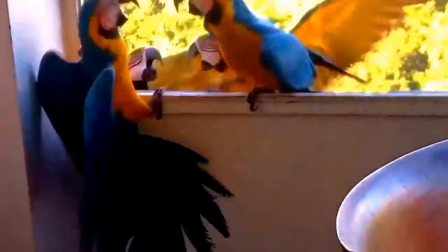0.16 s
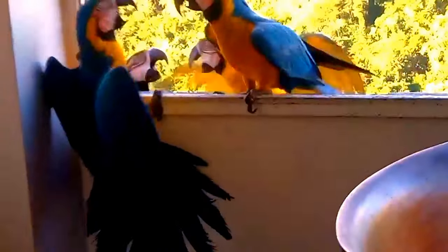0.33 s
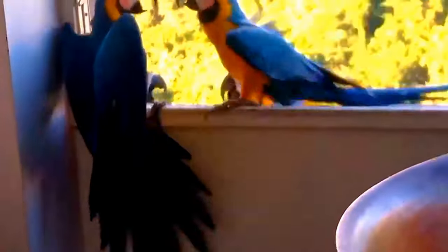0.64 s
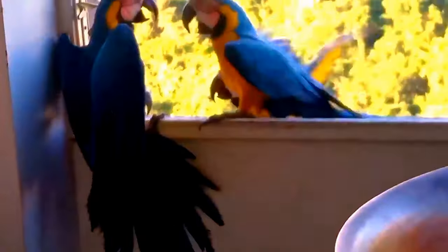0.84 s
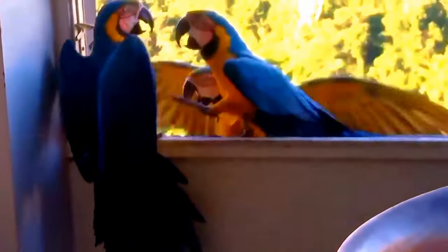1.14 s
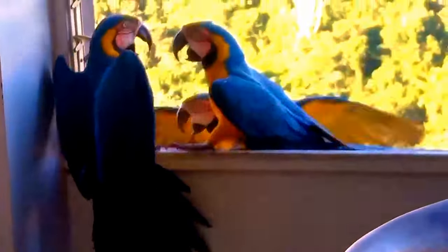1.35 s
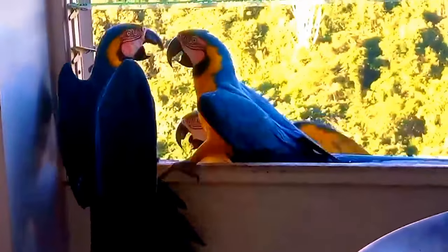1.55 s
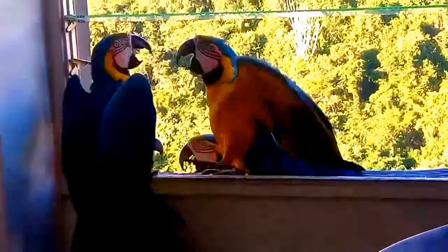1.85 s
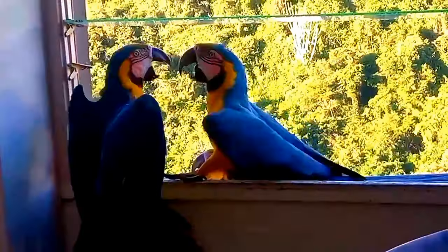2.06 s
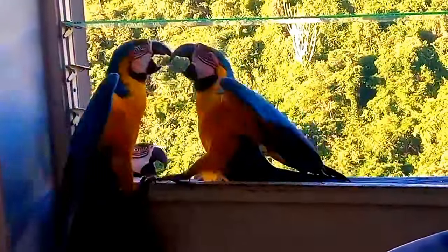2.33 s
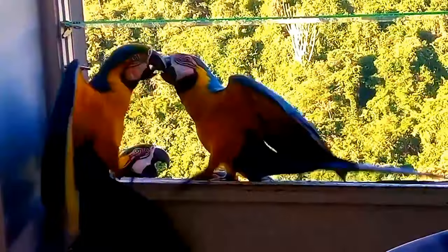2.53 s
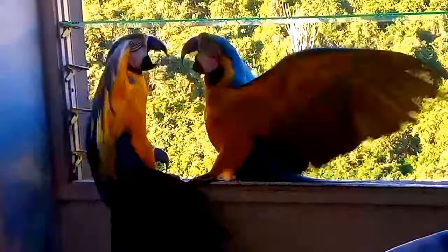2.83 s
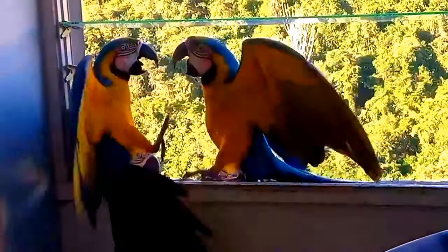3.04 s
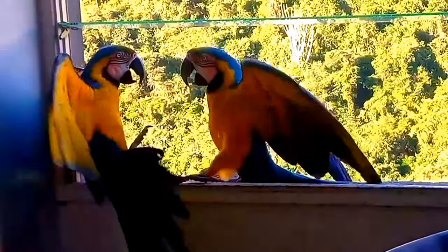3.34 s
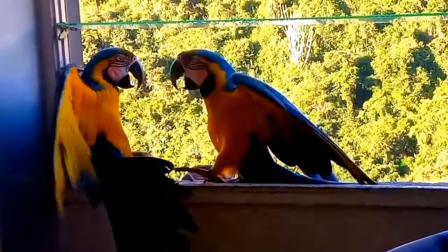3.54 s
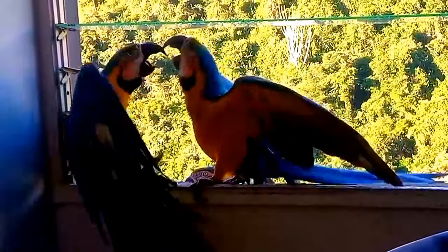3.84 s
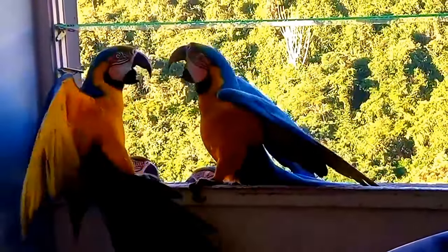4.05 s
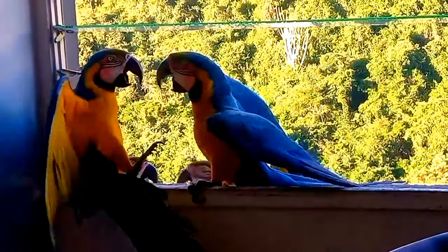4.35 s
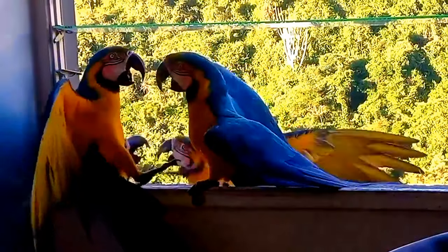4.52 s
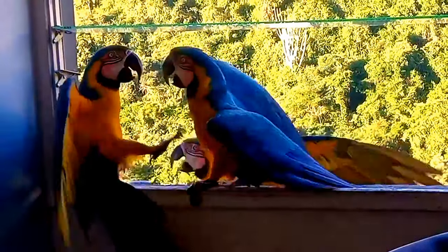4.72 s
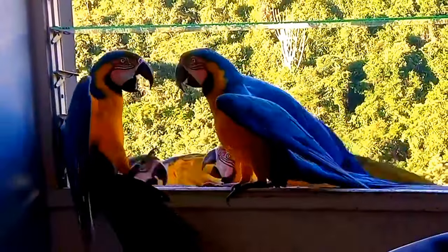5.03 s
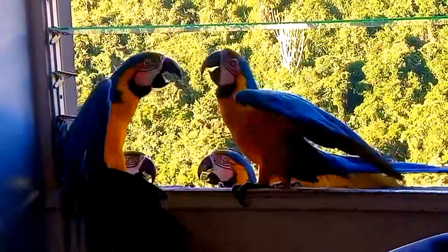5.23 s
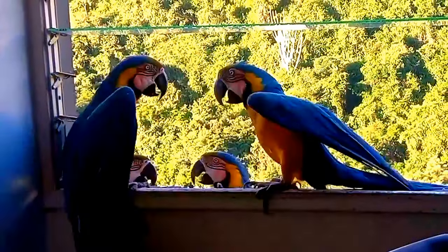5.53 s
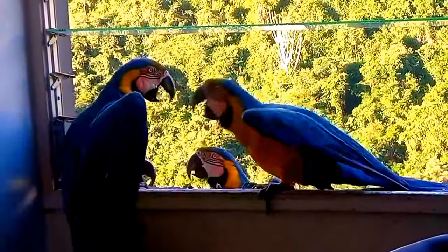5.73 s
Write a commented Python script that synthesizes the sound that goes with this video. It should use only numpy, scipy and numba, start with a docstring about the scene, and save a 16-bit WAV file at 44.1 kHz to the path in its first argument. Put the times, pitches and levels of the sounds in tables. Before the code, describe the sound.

At 0 s the sharp end of a parrot squawk breaks off into echo. Around 0.43 s clear, pitched cries rise, and from 0.55 s loud harsh rasps take over, two birds grating out of step, with a strong burst near 1.1 s and quick falling squeals at about 1.06, 1.27 and 1.68 s. The calls weaken and end by 1.83 s. From 2.1 to 3 s there is a lull: dying echo, soft grainy scuffs of feathers and claws, airy outdoor hush and low wavering traffic. A short cry at 3.0 s restarts the quarrel, raspy and growling until 3.9 s. After a brief gap, a cry at 4.2 s leads to strong rasps at 4.45 and 4.76 s, then rapid broken squawks, squeals and breathy hisses until about 5.9 s. Hard walls give roughly half a second of dense reverberation; the mono microphone is close, bright and limited.

```python
"""On the parapet of a hard-walled balcony several large parrots squabble: two rasping voices, pulse trains through
moving throat resonances, tangle with clear cries and falling squeals, which are sums of gliding partials.
Breath hisses through the beaks. In the gap feathers and claws scuff the ledge: decaying bursts of grainy noise.
The walls answer with a dense tail of echoes; distant traffic drones as two engine orders over rumble, with air noise.
"""
import sys
import numpy as np
from scipy import signal
from scipy.fft import rfft, irfft
from scipy.io import wavfile
from scipy.ndimage import uniform_filter1d, minimum_filter1d
from numba import njit

SR = 44100
rng = np.random.default_rng(int(sys.argv[2]) if len(sys.argv) > 2 else 0)


def digitize_waveform(pressure):
    """Quantize a signal to 16-bit integers and store it at the path in sys.argv[1].

    Rows of a 2-D input are taken as channels; values are limited to [-1, 1].
    """
    field = np.atleast_2d(pressure).T
    bounded = np.clip(field, -1, 1)
    quanta = np.round(bounded * 32767).astype(np.int16)
    wavfile.write(sys.argv[1], SR, quanta)


N = 259308

# Breath of the rasping birds, one list a spell. Each row: time in seconds, level of the hiss in dB,
# level of the low throat resonance in dB against the main one.
BREATH_SPELLS = [
    [(0.0, -37, -6), (0.01, -52, -29), (0.08, -73, -4), (0.116, -54, -17), (0.13, -63, -11)],
    [(0.46, -65, -16), (0.49, -48, -24), (0.535, -45, -24), (0.56, -51, -26), (0.652, -36, -20.5),
     (0.666, -47, -11.5), (0.868, -46.5, -9), (0.904, -74, -2), (0.922, -52, -14), (0.982, -41, -12),
     (1.02, -57, -13), (1.086, -33, -9), (1.206, -41, -12), (1.226, -62, -17), (1.284, -48, -15),
     (1.434, -57, -7), (1.462, -43, -13), (1.634, -72, 2.5), (1.676, -54, -4.5), (1.8, -58, -12)],
    [(3.04, -62, -11), (3.12, -58, -11), (3.142, -50, -7), (3.192, -48, -5), (3.204, -66, -28),
     (3.226, -40, -12), (3.26, -40, -5), (3.274, -58, -15), (3.304, -41, -3.5), (3.374, -48, -12.5),
     (3.42, -38.5, -13.5), (3.544, -50.5, -6.5), (3.69, -43.5, -10), (3.864, -62, -9.5), (3.92, -46, -27)],
    [(4.32, -71, -9), (4.346, -58, -9), (4.468, -56, -8.5), (4.502, -41, -13), (4.528, -43, -14),
     (4.538, -36.5, -7), (4.668, -49, -14), (4.684, -65, -12), (4.694, -43, -13.5), (4.74, -43, -18),
     (4.76, -30.5, -9), (5.028, -64, -6), (5.04, -64, -14), (5.044, -83, -7), (5.066, -52, -12),
     (5.16, -84, -8), (5.2, -62, -15)],
    [(5.28, -48, -17), (5.4, -70, -0.5), (5.478, -50, -26), (5.49, -44, -14.5), (5.566, -47, -5),
     (5.598, -51.5, -5.5), (5.75, -53, -15), (5.772, -41, -1), (5.788, -42, -13), (5.806, -34, -11),
     (5.846, -45, -7), (5.88, -45, -16)],
]


def amp(db):
    """Level is logarithmic: dB to amplitude ratio."""
    return 10 ** (np.asarray(db) / 20)


def rms_one(x):
    """Normalization by mean power: scaled to rms 1."""
    return x / np.sqrt(np.mean(x ** 2) + 1e-20)


def columns(rows):
    """Linear interpolation: first sample of a table and its columns, one value a sample over its span."""
    times, *cols = np.transpose(rows)
    at = np.arange(int(times[0] * SR), min(int(times[-1] * SR), N))
    return at[0], [np.interp(at / SR, times, col) for col in cols]


def wobble(count, rate_hz):
    """Random modulation: noise through a double real pole at the rate, rms 1."""
    r = np.exp(-2 * np.pi * rate_hz / SR)
    settling = 4000  # samples dropped while the filter settles
    noise = rng.standard_normal(count + settling)
    return rms_one(signal.lfilter([1], [1, -2 * r, r * r], noise)[settling:])


def coloured(spectrum, count):
    """Spectral shaping: white noise weighted by (Hz, dB per Hz) points joined over log frequency; rms 1."""
    hz = np.fft.rfftfreq(count, 1 / SR) + 1
    at_hz, db = np.transpose(spectrum)
    weight = amp(np.interp(np.log(hz), np.log(at_hz), db))
    return rms_one(irfft(rfft(rng.standard_normal(count)) * weight, count))


def filtered(x, order, hz, kind):
    """Frequency selection by a Butterworth filter."""
    return signal.sosfilt(signal.butter(order, hz, kind, fs=SR, output="sos"), x)


def edges(count, rise_s=.012, fall_s=.015):
    """Linear ramps at both ends of a call keep the spectrum free of clicks."""
    t = np.arange(count) / SR
    return np.clip(t / rise_s, 0, 1) * np.clip((t[-1] - t) / fall_s, 0, 1)


def air():
    """Broadband noise whose level drifts at random, the hush of the air outside."""
    # Each row: frequency in Hz, density in dB per Hz.
    air_spectrum = [(150, -82), (250, -8), (366, 4.5), (595, 0), (872, 15.5), (2150, 9), (2840, 12),
                    (6410, 7), (8030, -4), (14700, -7), (15800, -15)]
    return amp(-52.5) * coloured(air_spectrum, N) * amp(3.2 * wobble(N, 3.6))


def traffic():
    """Harmonic engine orders, a fundamental and its octave that waver in level, over band-passed rumble."""
    # Distant engines. Each row: time in seconds, first order in Hz, level in dB.
    drone = [(0, 78, -50), (.45, 82.9, -50.5), (1.4, 83, -71), (1.75, 82.2, -49), (1.9, 82, -51),
             (2.4, 79.2, -53.5), (2.6, 77.2, -63), (2.72, 72.3, -56), (3.0, 66.2, -51), (3.6, 65.7, -69),
             (4.14, 72.1, -54.5), (4.9, 69.7, -72.5), (5.2, 70, -57), (5.88, 76.7, -73)]
    _, (engine_hz, level_db) = columns(drone)
    count = len(engine_hz)
    phase = 2 * np.pi * np.cumsum(engine_hz) / SR
    engine = np.zeros(count)
    for order, order_db in [(1, 0.023), (2, -3)]:
        size = np.sqrt(2) * amp(level_db + order_db + 2.5 * wobble(count, 8))
        engine += size * np.sin(order * phase)
    rumble = rms_one(filtered(rng.standard_normal(count), 2, [50, 220], "band"))
    return np.pad(engine + amp(-59) * rumble, (0, N - count))


def scuffs():
    """Friction noise of feathers and claws: grainy bursts that start sharply and decay exponentially."""
    # Each row: start in seconds, relative level in dB, time to fall 60 dB in seconds.
    scuff_events = [(2.142, -28.5, 0.13), (2.243, -26.5, 0.21), (2.29, -26.5, 0.19), (2.5355, -23.5, 0.31),
                    (2.674, -21.5, 0.19), (2.71, -24, 0.64), (2.8724, -26, 0.23)]
    # Each row: frequency in Hz, density in dB per Hz.
    scuff_spectrum = [(350, -7), (600, -6), (737, 4.5), (789, -7), (1190, 0), (1770, -5), (2060, 0),
                      (6400, -1.5), (7650, -12.5), (15800, -17.5)]
    rise_s, common_db = 0.0043, -16.5
    t, envelope = np.arange(N) / SR, np.zeros(N)
    for start_s, burst_db, t60 in scuff_events:
        since = t - start_s
        decay_db = -60 * np.maximum(since, 0) / t60
        envelope += np.clip(since / rise_s, 0, 1) * amp(burst_db + common_db + decay_db)
    grain = amp(2.3 * wobble(N, 160))
    return envelope * coloured(scuff_spectrum, N) * grain


def airflow(rows):
    """Turbulence noise: air hisses through the open beak in trembling, grainy bursts."""
    # Each row: frequency in Hz, density in dB per Hz.
    hiss_spectrum = [(4410, -17.5), (7500, 0), (7910, -8), (10600, -8.5), (12600, -10), (14500, -9.5),
                     (15800, -23)]
    start, (hiss_db, _) = columns(rows)
    count = len(hiss_db)
    tremble_db, grain_db = 2.6 * wobble(count, 30), 1.6 * wobble(count, 400)
    hiss = amp(hiss_db + tremble_db + grain_db) * coloured(hiss_spectrum, count)
    return start, hiss * edges(count)


def swell(count, rise_s, fade_s):
    """Amplitude envelope in dB: a call starts and ends 20 dB down."""
    t = np.arange(count) / SR
    rise = np.maximum(1 - t / rise_s, 0)
    fade = np.maximum(1 + (t - t[-1]) / fade_s, 0) ** 2
    return -20 * (rise + fade)


def partials(pitch, levels_db, tremor, throb_db):
    """Additive synthesis with frequency tremor; amplitude modulation gives each partial a noisy skirt."""
    count = len(pitch)
    shake = 1 + tremor * (wobble(count, 60) + wobble(count, 250))
    phase = 2 * np.pi * np.cumsum(pitch * shake) / SR
    tone = np.zeros(count)
    for number, level_db in enumerate(levels_db, 1):
        throb = amp(level_db + throb_db * wobble(count, 21.0))
        breath_skirt = 1 + 0.16 * wobble(count, 178)
        tone += throb * breath_skirt * np.cos(number * phase)
    return amp(6.5) * edges(count) * tone


def squeal(row):
    """Harmonics of a falling whistle, which flare as they cross a throat resonance."""
    # Levels in dB of the first four partials.
    squeal_partials_db = [-10.5, 1, -4, -13]
    flare_db, throat_hz, throat_width_hz = 7, 2680, 190
    start_s, hold_s, drop_s, length, top_hz, bottom_hz, level_db, tilt_db = row
    t = np.arange(int(length * SR)) / SR
    pitch = np.interp(t, [hold_s, max(drop_s, hold_s + 1e-3)], [top_hz, bottom_hz])
    shape_db = level_db + swell(len(t), rise_s=0.019, fade_s=0.0038)
    levels_db = []
    for k, partial_db in enumerate(squeal_partials_db):
        distance = ((k + 1) * pitch - throat_hz) / throat_width_hz
        levels_db.append(shape_db + partial_db + tilt_db * (k - 1) + flare_db * np.exp(-distance ** 2))
    # five faint partials above the fourth
    upper_db = [levels_db[3] - 18.5 - 4.9 * k for k in range(5)]
    return int(start_s * SR), partials(pitch, levels_db + upper_db, tremor=.007, throb_db=3.5)


def cry(row):
    """Harmonics on a pitch that glides and turns; a mouth resonance lifts the partial nearest to it."""
    # Levels in dB of the partials from the first up.
    cry_partials_db = [-12, -3, -3, -3, -11, -13, -24]
    mouth_db, mouth_width_hz = 9.5, 83
    onset_tilt = .3  # upper partials start and end further down, so the top opens up in the swell
    start_s, rise_s, turn_s, length, first_hz, turn_hz, last_hz, level_db, tilt_db, mouth_hz = row
    glide = [(start_s, first_hz), (start_s + turn_s, turn_hz), (start_s + length, last_hz)]
    start, (pitch,) = columns(glide)
    shape_db = swell(len(pitch), rise_s, fade_s=0.037)
    levels_db = []
    for k, partial_db in enumerate(cry_partials_db):
        lift_db = mouth_db * np.exp(-(((k + 1) * pitch - mouth_hz) / mouth_width_hz) ** 2)
        tilted_db = level_db + partial_db + tilt_db * (k - 1)
        levels_db.append(tilted_db + shape_db * (1 + onset_tilt * k) + lift_db)
    return start, partials(pitch, levels_db, tremor=.014, throb_db=5.5)


def snaps(pitch, rough):
    """Pulse excitation: the syrinx snaps shut once a cycle, unevenly, and lets turbulence through each cycle."""
    count = len(pitch)
    unsteady = .022 * wobble(count, 150) + .07 * wobble(count, 22)
    turns = np.cumsum(pitch * (1 + rough * unsteady)) / SR
    # spells of strong-weak cycles put lines halfway between the partials
    doubling_db = 8 * rough * wobble(count, 12) * (-1) ** np.floor(turns)
    uneven_db = 4.5 * rough * rng.standard_normal(count)
    clicks = np.diff(np.floor(turns), prepend=0) * amp(doubling_db + uneven_db)
    gate = (.5 + .5 * np.cos(2 * np.pi * turns)) ** 2
    turbulence = rms_one(gate * rng.standard_normal(count))
    return rms_one(clicks - clicks.mean()) + .42 * rough * turbulence


@njit
def resonate(x, cosine, r):
    """A two-pole resonance with a moving centre, passed twice for dark valleys."""
    for _ in range(2):
        y = np.zeros(len(x))
        for i in range(2, len(x)):
            y[i] = x[i] - x[i - 2] + 2 * r * cosine[i] * y[i - 1] - r * r * y[i - 2]
        x = y
    return x


def evened(source, hz, width_hz):
    """Resonance with automatic gain: the ringing is divided by its running rms."""
    cosine = np.cos(2 * np.pi * hz / SR) * np.ones(len(source))
    ringing = resonate(source, cosine, np.exp(-np.pi * width_hz / SR))
    return ringing / np.sqrt(uniform_filter1d(ringing ** 2, size=2000) + 1e-12)


def rasp(rows):
    """Source and filter: two syrinxes out of step drive throat resonances that shift as tongue and beak work."""
    # Roughness of the voice. Each row: time in seconds, roughness from 0 (clear) to 1 (harsh).
    rough_curve = [(0, .6), (.55, .45), (.63, .5), (.7, .6), (1.0, .4), (1.15, .35), (1.21, .1),
                   (1.29, .12), (1.35, .5), (1.6, .4), (1.64, .1), (1.69, .08), (1.72, .8), (3.14, .55),
                   (3.28, .35), (3.38, .25), (3.42, .4), (3.6, .6), (3.625, .04), (3.69, .06), (3.72, .4),
                   (3.77, .08), (3.86, .1), (4.46, .7), (4.54, .3), (4.62, .35), (4.7, .45), (4.8, .35),
                   (5.02, .75), (5.1, .45), (5.35, .35), (5.42, .8), (5.47, .65), (5.6, .45), (5.88, .35)]
    # The bird that rasps along. Each row: start in seconds, length in seconds, pitch at start in Hz,
    # pitch at end in Hz, level in dB against the first bird.
    rival_calls = [(0.68, 0.13, 785.4, 691, 6), (0.82, 0.21, 483.4, 468.3, 0.5),
                   (1.08, 0.32, 717, 684.7, -4.5), (3.15, 0.5, 470.4, 476.3, -5.5),
                   (3.68, 0.23, 708, 632.5, 2.5), (4.47, 0.53, 500.1, 457.6, -3.5),
                   (5.45, 0.32, 452.2, 416.5, -1), (5.75, 0.11, 596.5, 589, 5)]
    # Growl, low throat and beak resonances. Each row: centre in Hz, width of one pass in Hz.
    throat = [(420, 320), (930, 560), (5000, 950)]
    main_width_hz, mid_width_hz = 793, 680
    beak_db = -11  # against the main resonance
    tip_hz, tip_width_hz, tip_db = 6290, 850, -8.5  # the beak tip sounds along with the beak
    start, (pitch, level_db, main_hz, mid_hz, mid_db, growl_db, bright_db) = columns(rows)
    count = len(pitch)
    t = (start + np.arange(count)) / SR

    source = snaps(pitch, np.interp(t, *np.transpose(rough_curve)))
    for rival_s, length, first_hz, last_hz, rival_db in rival_calls:
        begin, (rival_hz,) = columns([(rival_s, first_hz), (rival_s + length, last_hz)])
        if start <= begin < start + count:
            rival = amp(rival_db) * snaps(rival_hz, .45) * edges(len(rival_hz))
            part = source[begin - start:][:len(rival)]
            part += rival[:len(part)]  # a view: adds into the source

    moving_hz = main_hz * (1 + 0.054 * wobble(count, 14.8))
    voice = evened(source, moving_hz, main_width_hz)
    voice -= amp(mid_db) * evened(source, mid_hz, mid_width_hz)
    breath_s, _, low_db = np.transpose(np.vstack(BREATH_SPELLS))
    parts_db = [np.interp(t, breath_s, low_db), beak_db + bright_db]
    # low throat and beak, with alternating sign
    for sign, (hz, width_hz), part_db in zip([1, -1], throat[1:], parts_db):
        shift = 1 + .07 * wobble(count, 9)
        gain = amp(part_db + 2.74 * wobble(count, 18.4))
        voice += sign * gain * evened(source, hz * shift, width_hz)
    tip_gain = amp(parts_db[-1] + tip_db + 5.95 * wobble(count, 3.6))
    voice -= tip_gain * evened(source, tip_hz, tip_width_hz)

    voice = filtered(voice, 6, 620, "high")  # the growl alone sounds fully below this
    growl_source = rms_one(source) + 1.6 * rng.standard_normal(count)
    voice -= amp(growl_db + 3.4 * wobble(count, 23.5)) * evened(growl_source, *throat[0])
    flutter = amp(3.52 * wobble(count, 35.8))  # the breath pressure trembles
    rise_s = min(.025, t[0] + 0.00065)  # a call at time zero is there almost at once
    return start, voice * amp(level_db) * flutter * edges(count, rise_s)


def birds():
    """Superposition of all calls in time; small bodies radiate little bass, hence a high-pass."""
    # Squeals. Each row: start in seconds, hold in seconds, end of the drop in seconds after the start,
    # length in seconds, top in Hz, bottom in Hz, relative level in dB, tilt in dB per partial.
    squeal_calls = [(1.06, .015, .045, 0.076, 2000, 1447, -25, 1),
                    (1.27, 0.009, 0.063, 0.059, 1835, 1445, -27, 0.5),
                    (1.678, 0.012, .035, 0.057, 1640, 1396, -26, -0.5),
                    (3.1, .042, 0.048, 0.15, 1890, 1520, -32.5, 0.5),
                    (4.35, 0.014, 0.046, 0.085, 1580, 1340, -28.5, -1.5),
                    (4.958, 0.01033, 0.026, .048, 1640, 1540, -31, 2.5),
                    (5.179, 0.0086, 0.036, 0.05, 1675, 1530, -42.5, 0.5),
                    (5.228, 0.041, 0.067, 0.088, 1683, 1396, -25, 0.5),
                    (5.646, 0.007, 0.029, 0.037, 1730, 1483, -25.5, 0.5),
                    (5.83, 0.0068, .03, .049, 1560, 1548, -36, 0)]
    # Clear cries. Each row: start in seconds, swell in seconds, turn of the pitch in seconds after the start,
    # length in seconds, pitch at start, turn and end in Hz, relative level in dB, tilt in dB per partial,
    # mouth resonance in Hz.
    cry_calls = [(0.429, 0.058, 0.045, 0.098, 805, 927, 910, -29, 0.5, 2900),
                 (0.444, 0.033, 0.039, 0.093, 848, 1064, 1000, -24, -2.5, 4096),
                 (0.602, 0.02, 0.049, 0.054, 961, 924, 935, -22, 2.5, 1900),
                 (0.83, 0.016, 0.057, 0.089, 818, 743, 816, -33, 2.5, 1580),
                 (0.992, 0.017, 0.051, 0.14, 897, 965, 980, -32, 1.5, 1947),
                 (1.29, 0.033, 0.018, 0.093, 974, 927, 957, -34, 2.5, 1890),
                 (1.395, 0.019, 0.057, 0.14, 955, 966, 701, -34, 0, 1930),
                 (1.565, 0.0061, 0.067, 0.11, 914, 831, 840, -30.5, 0, 904),
                 (1.635, 0.026, 0.0397, 0.088, 870, 905, 969, -33, 1.5, 2810),
                 (3.012, 0.034, 0.023, 0.042, 894, 1030, 1010, -22, -6, 1560),
                 (3.036, 0.012, 0.076, 0.15, 822, 922, 950, -34, -3, 1820),
                 (3.036, 0.0059, 0.047, 0.18, 766, 795, 751, -41.5, -2.5, 1525),
                 (3.859, 0.042, 0.055, 0.2, 969, 971, 921, -34, -4, 1960),
                 (3.899, 0.025, 0.064, 0.13, 1140, 1088, 1078, -37, -8.5, 2200),
                 (4.224, 0.043, 0.0385, 0.0954, 777, 855, 790, -25.5, -4, 1610),
                 (4.326, 0.019, 0.042, 0.066, 838, 855, 740, -38, 3.5, 1698),
                 (4.63, 0.027, 0.036, 0.083, 811, 781, 745, -27.5, -1.5, 2370),
                 (4.735, 0.01, 0.042, 0.06, 935, 933, 965, -25.5, -8, 1890),
                 (5.161, 0.023, 0.033, 0.083, 872.5, 857, 879, -27.5, -2, 870),
                 (5.31, 0.039, 0.053, 0.19, 746.4, 680.5, 820, -35, -3, 2804),
                 (5.635, 0.013, 0.032, 0.092, 851, 874, 852, -33.5, 0.5, 1780)]
    # Rasping squawks, one list a call. Each row: time in seconds, pitch in Hz, level in dB,
    # main resonance in Hz, mid resonance in Hz, then in dB against the main one: mid level, growl level,
    # brightness of the beak.
    rasp_calls = [
        [(0.0, 702, -14.5, 2730, 1640, -9, -49, 3), (0.04, 712.5, -35, 2790, 1480, -23, -55, -7),
         (0.124, 711, -45.5, 3000, 1690, -23, 5, 12)],
        [(0.548, 807, -9, 3430, 2090, -4, -60, -8), (0.582, 785.3, -11.5, 3380, 1930, -11.5, -71, 3.5),
         (0.66, 611, -13.5, 3150, 1890, 2.5, -52, -3), (0.726, 659.7, -25, 2360, 1700, -3, -44, 12),
         (0.822, 593, -22, 2600, 1700, -14, -25, -2), (0.89, 525, -36.5, 2800, 1580, -3, -32, 17),
         (0.95, 526.5, -18, 2800, 1738, -14, -23, -2), (1.02, 549, -17.5, 3520, 1970, 3, -57, 3)],
        [(1.03, 536, -36, 3880, 2060, 4, -55, 3), (1.075, 537, -10, 3830, 2200, -8, -52, -7),
         (1.1, 542.6, -14, 3250, 1480, -0.5, -43, -3), (1.15, 544.3, -19, 2490, 1310, -8, -40, 7),
         (1.2, 548.3, -22, 3500, 2140, 0, -36, -3), (1.235, 556.5, -32, 2740, 2180, 4, -42, -12),
         (1.28, 558, -31, 2800, 2130, -2, -41, 3), (1.418, 474, -34.5, 3480, 1950, 11.5, -80, 4.5),
         (1.47, 480, -51, 3302, 1900, 14, -40, 23), (1.484, 501.3, -29, 3030, 1670, 3, -7, 17),
         (1.564, 449.7, -30.5, 2650, 1650, -2, -21, 12), (1.62, 452, -40, 3500, 1850, 5, -71, -4)],
        [(1.63, 514.4, -32, 3040, 1723, -10, -58, 12), (1.698, 543, -28.5, 2970, 1620, -2, -63, 12),
         (1.73, 731.4, -30.5, 2800, 1514, -7, -64, -10), (1.83, 704, -28.5, 2770, 1590, -21, -44, -5)],
        [(3.14, 455.6, -29.5, 3180, 1730, 1, -16, 12), (3.218, 471.3, -16.5, 2500, 2030, -15, -33, 0),
         (3.27, 541.2, -18, 2820, 1620, -13, -34, 7.5), (3.36, 540.6, -19, 2730, 1600, -9, -29, 0),
         (3.424, 588, -16.5, 2790, 1910, -8, -22, 7.5), (3.538, 556.2, -25.5, 2830, 1890, -6, -32, -0.5),
         (3.61, 513, -24, 2740, 1660, -4, -19, 3.5), (3.655, 533.5, -15, 3160, 1560, -15.5, -47, -3),
         (3.684, 560, -20, 3100, 1530, -7, -56, 6.5), (3.77, 525, -25.5, 2530, 1600, -17, -22, 0.5),
         (3.92, 516.8, -22.5, 3250, 2110, 11, -41, 0.5)],
        [(4.32, 816.4, -29, 2660, 1990, 15, -59, 9), (4.414, 830, -18, 2550, 1700, -28, -76, 1),
         (4.452, 756, -12, 2620, 1720, -9, -40.5, -18)],
        [(4.46, 494.4, -18, 2500, 1730, -14, -12.5, -9), (4.576, 580.3, -20.5, 3000, 1530, -4.5, -22, 1.5),
         (4.654, 471.5, -25, 2620, 1610, -4, -16.5, 0), (4.76, 507, -11, 2800, 1840, -14.5, -33, 3.5),
         (4.856, 536.3, -19, 2670, 1800, -9, -23, 9), (4.93, 475.4, -27.5, 2330, 1660, -7, -19, -16),
         (5.006, 538, -31.5, 3350, 1930, -3, -61, 4), (5.038, 785, -24, 2780, 1950, -7.5, -49, 1.5),
         (5.2, 800.4, -38.5, 3100, 1760, 6.5, -42, -4)],
        [(5.28, 756, -20.5, 2886, 1543, 1, -66, -3.5), (5.418, 726, -33.5, 2640, 1470, -22, -27, 3)],
        [(5.425, 479.2, -32, 2000, 1490, 11, -13, -3), (5.46, 490.6, -18, 2360, 1790, -5, -22, -10.5),
         (5.494, 504.2, -14, 2740, 1920, -17, -37, 4.5), (5.55, 527.3, -24, 2820, 1700, -3, -25, 4),
         (5.712, 498.7, -27, 2670, 1560, -17, -20, -1), (5.764, 555.3, -21, 3480, 1658, -6, -52, 4.5),
         (5.88, 498.6, -23.5, 2770, 1600, 0.5, -17, 8)],
    ]
    voices = [(airflow, BREATH_SPELLS), (squeal, squeal_calls), (cry, cry_calls), (rasp, rasp_calls)]
    out = np.zeros(N)
    for play, calls in voices:
        for start, call in map(play, calls):
            out[start:start + len(call)] += call
    return filtered(out, 6, 330, "high")


def balcony(x):
    """Reverberation by convolution with a dense noise tail whose decay time depends on frequency."""
    # Each row: frequency in Hz, time to fall 60 dB in seconds.
    balcony_t60 = [(300, 0.53), (2500, 0.57), (6000, 0.61), (14000, 0.22)]
    t = np.arange(int(.8 * SR)) / SR
    band_edges = np.geomspace(200, 16000, 11)
    at_hz, t60 = np.transpose(balcony_t60)
    tail = np.zeros(len(t))
    for low, high in zip(band_edges, band_edges[1:]):
        band = filtered(rng.standard_normal(len(t)), 2, [low, high], "band")
        band_t60 = np.interp(np.log(low * high) / 2, np.log(at_hz), t60)
        tail += band * amp(-60 * t / band_t60)
    tail = tail * (t > .006)  # the first wall is a metre away
    gain = np.sqrt(np.mean(np.abs(rfft(tail)[800:4000]) ** 2))
    # the birds never sit still: their path to the walls wavers (rms delay in seconds, rate in Hz)
    stir_s, stir_hz = .00013, 14
    samples = np.arange(N)
    x = np.interp(samples + stir_s * SR * wobble(N, stir_hz), samples, x)
    return signal.fftconvolve(x, tail / gain)[:N]


def scene():
    """Superposition: air and traffic from outside, scuffs and birds direct and reverberant; one channel."""
    outside = air() + traffic()
    near = scuffs() + birds()
    return (outside + near + amp(-2) * balcony(near))[None]


def capsule_port(x):
    """Resonance of the microphone's capsule port, a two-pole band-pass added to the sound."""
    port_hz, width_hz, port_db = 15100, 690, 1
    r = np.exp(-np.pi * width_hz / SR)
    poles = [1, -2 * r * np.cos(2 * np.pi * port_hz / SR), r * r]
    return x + amp(port_db) * (1 - r * r) / 2 * signal.lfilter([1, 0, -1], poles, x)


def sinking_bass(x):
    """Side-chain control: the low hum and rumble sink while the calls are bright and return between them."""
    from_db, slope, window_s, most_db, bass_hz = -35, 1.2, 0.077, 17, 363
    treble = filtered(x, 2, [4300, 7000], "band")
    level_db = 10 * np.log10(uniform_filter1d(treble ** 2, size=int(window_s * SR)) + 1e-12)
    low_pass = 1 / (1 + (np.fft.rfftfreq(N, 1 / SR) / bass_hz) ** 8)
    bass = irfft(rfft(x) * low_pass, N)
    return x - bass + bass * amp(-np.clip(slope * (level_db - from_db), 0, most_db))


def limited(x):
    """Look-ahead limiting: 0.8 dB less gain for each dB of peak over the threshold, with a gradual release."""
    threshold_db, release_db_s = -4, 150  # the held excess falls at the release rate
    over_db = np.maximum(20 * np.log10(np.abs(x[0]) + 1e-9) - threshold_db, 0)
    fall_db = release_db_s * np.arange(N) / SR
    held_db = np.maximum.accumulate(over_db + fall_db) - fall_db
    widest_db = -minimum_filter1d(-held_db, size=177)  # running maximum, sees peaks ahead
    return x * amp(-.8 * uniform_filter1d(widest_db, size=88))


def record(dry):
    """Processing in series: port resonance, bass that sinks under bright calls, limiter and a steep low-pass."""
    held = limited(sinking_bass(capsule_port(dry)))
    return signal.sosfilt(signal.cheby2(18, 60, 16050, fs=SR, output="sos"), held)


dry = scene()
out = record(dry)
digitize_waveform(out)
```